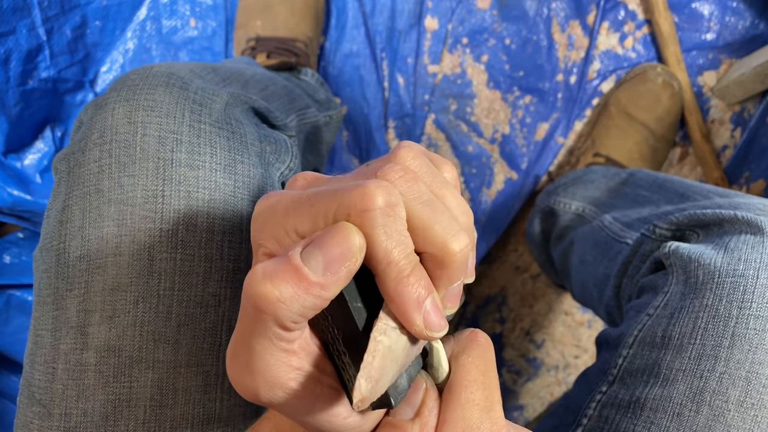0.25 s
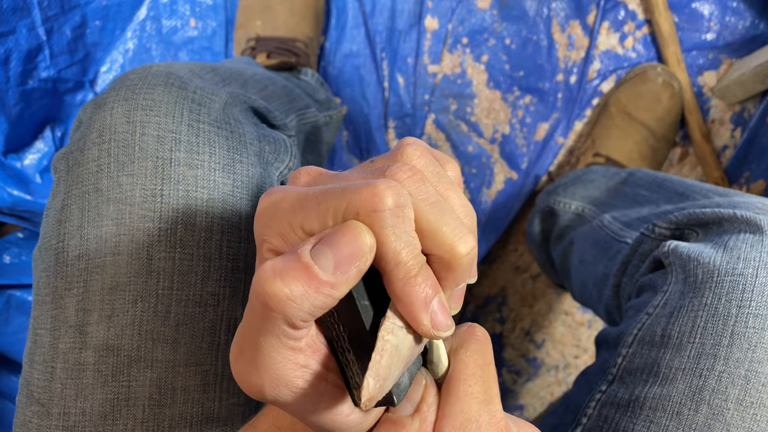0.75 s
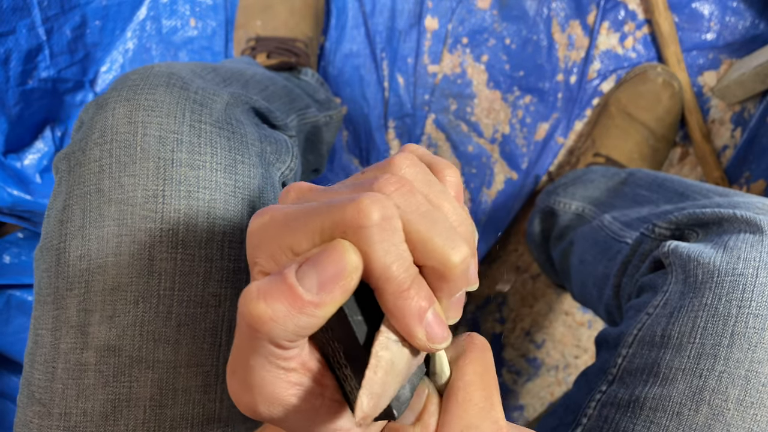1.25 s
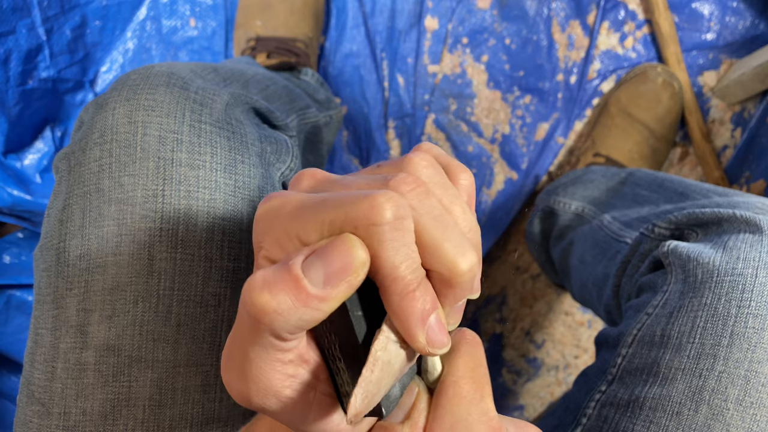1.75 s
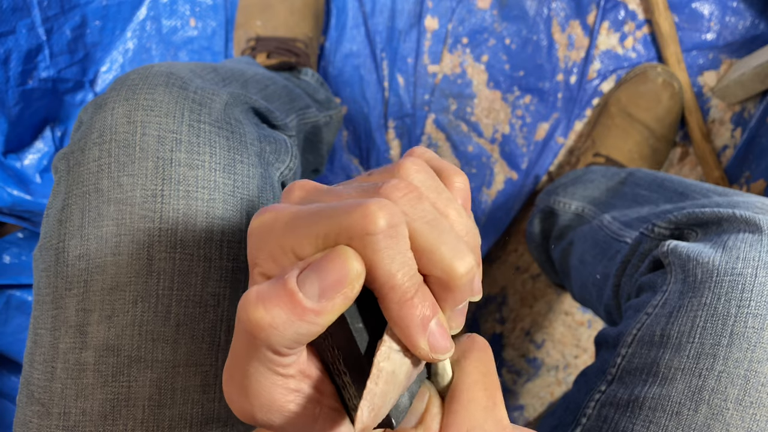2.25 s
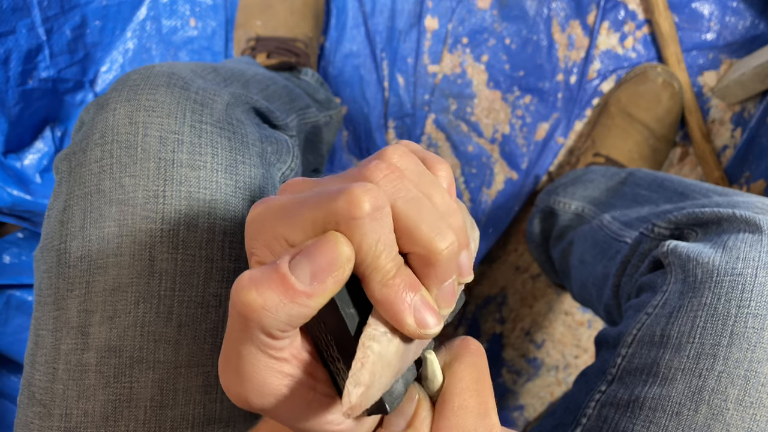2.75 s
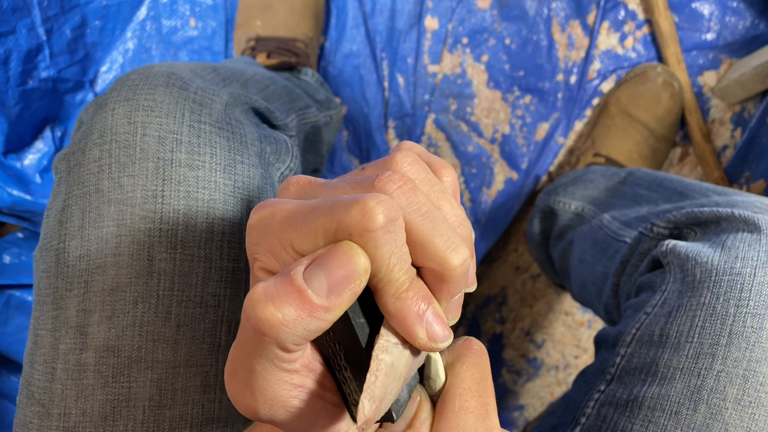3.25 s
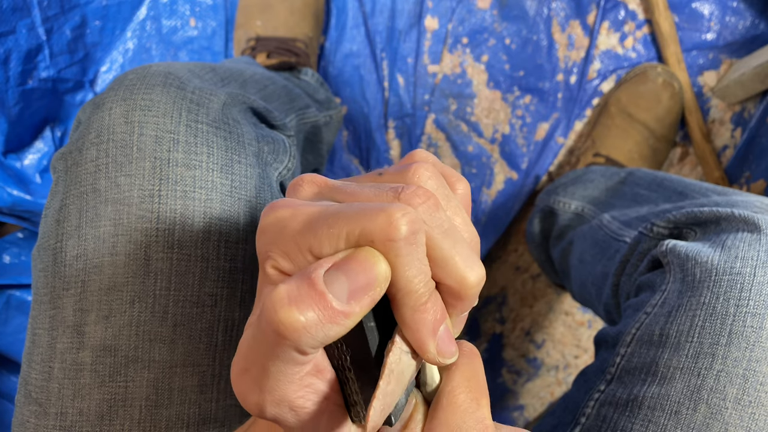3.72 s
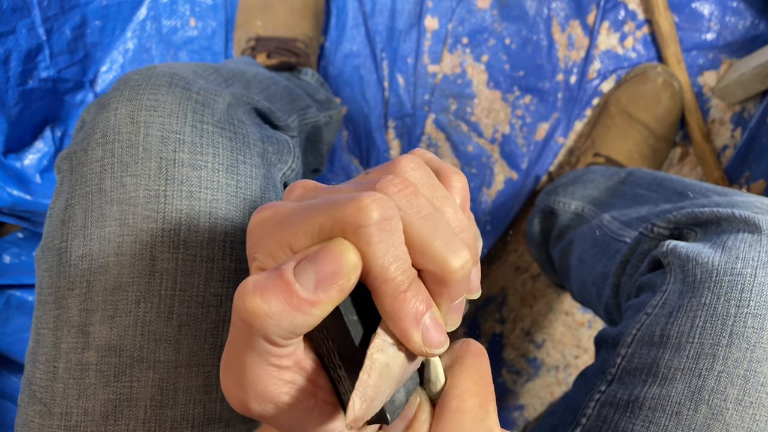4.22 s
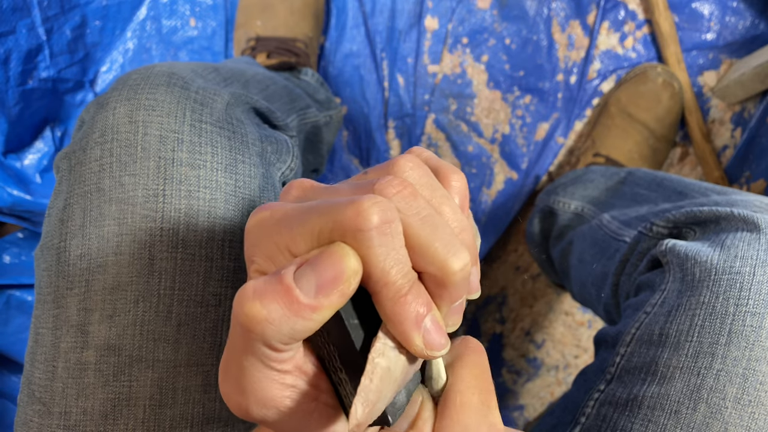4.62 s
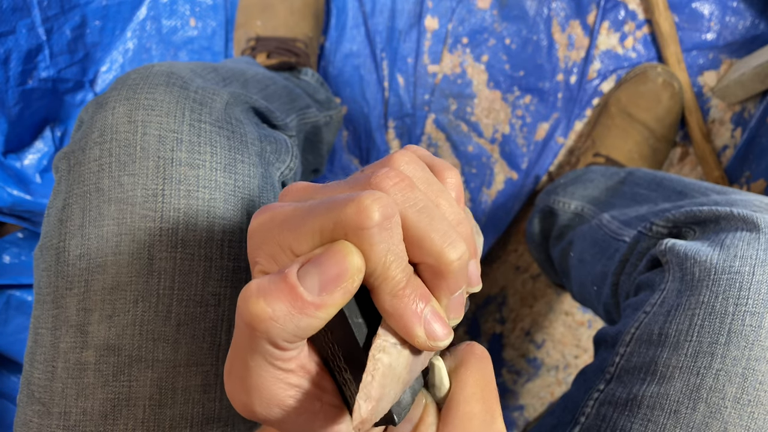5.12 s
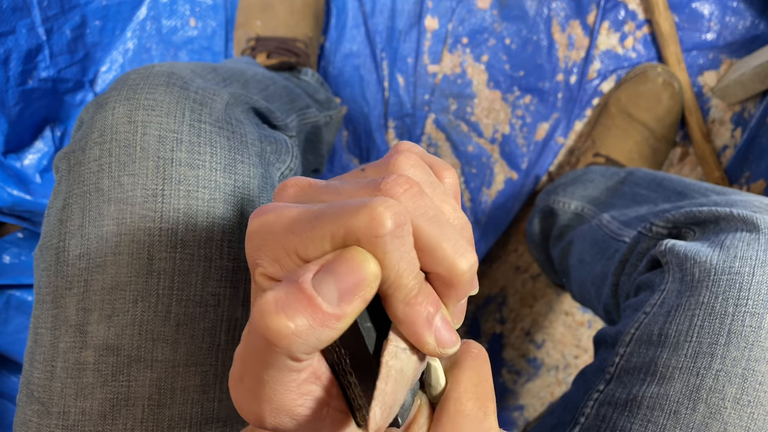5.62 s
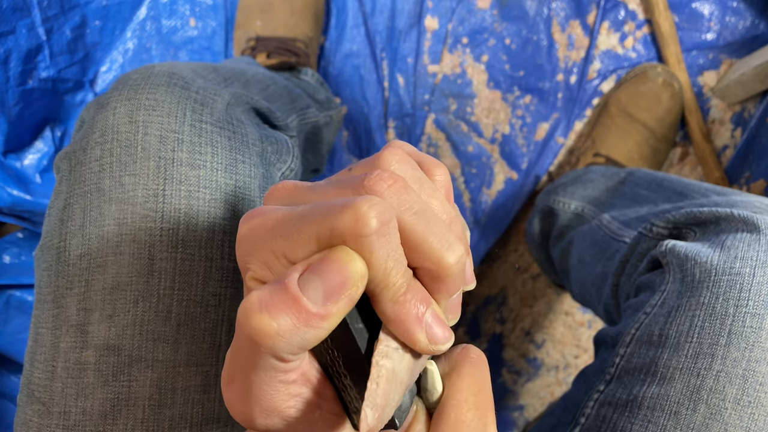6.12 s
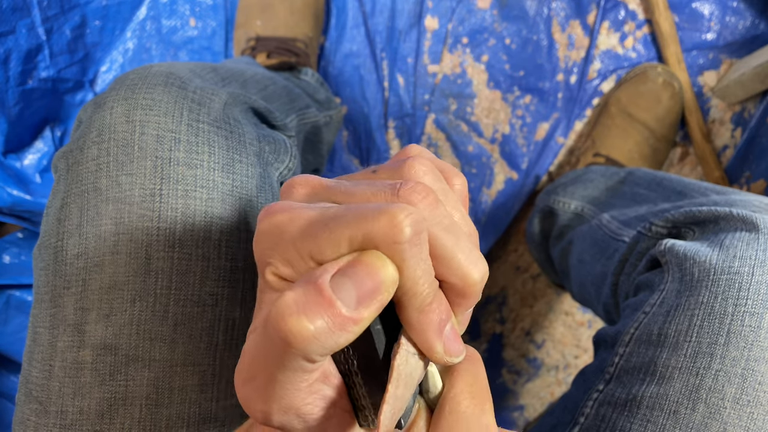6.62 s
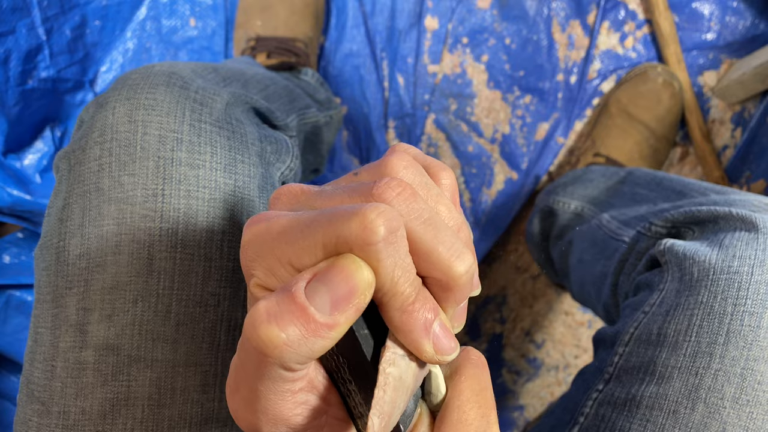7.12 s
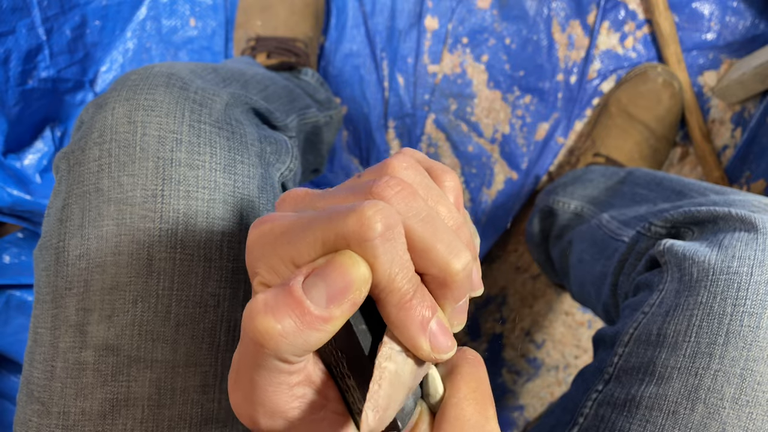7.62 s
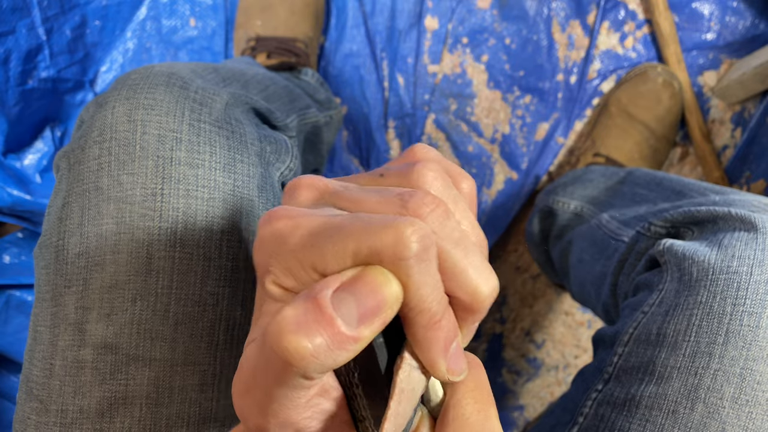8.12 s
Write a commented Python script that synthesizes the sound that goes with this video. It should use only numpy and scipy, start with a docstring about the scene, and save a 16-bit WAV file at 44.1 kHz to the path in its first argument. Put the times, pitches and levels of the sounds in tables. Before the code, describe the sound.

Very close, a pointed tool presses flakes off a hand-held stone. After a quiet second a sharp crack snaps, then a quick cluster of smaller clicks and gritty ticks, a pause, another hard crack near four seconds, and scattered snaps to the end. Each rings only briefly in a small dry room. A low ventilation hum swells and sinks beneath soft air noise.

```python
"""Pressure flaking of a hand-held flint, close by, in a small dry room.
From the start filtered noise gives a ventilation hum that swells and sinks, a rush of air and a far sine-wave motor.
Soon the tool tip grits on the edge in small noise bursts, and faint whistles of narrow noise fall in pitch.
From the first second flakes snap off: jerky noise bursts run for milliseconds; stone and room ring on briefly.
Soft rustles and scrapes of dense grit follow between the breaks; the motor is loudest in the middle."""
import sys
import numpy as np
from scipy import signal
from scipy.fft import rfft, irfft
from scipy.io import wavfile
from scipy.ndimage import uniform_filter1d

SR = 44100
rng = np.random.default_rng(int(sys.argv[2]) if len(sys.argv) > 2 else 0)


def generate_wav(signal):
    """Clip the signal to [-1, 1] and save it as 16-bit WAV at the path in sys.argv[1]."""
    frames = np.transpose(np.atleast_2d(signal))
    scaled = np.clip(frames, -1, 1) * 32767
    pcm = np.round(scaled).astype(np.int16)
    wavfile.write(sys.argv[1], SR, pcm)


N = 368676
TIME = np.arange(N) / SR

# Flakes snapping off: (time [s], crack level [dB], thud re crack [dB], knock re crack [dB],
# plate ring re crack [dB], top re crack [dB], flake pitch [Hz], crack duration [s])
FLAKE_SNAPS = [(1.0156, -16.5, -27.5, -12, -4.5, -4, 2600, 0.0035),
               (1.4851, -31.5, -21, -5.5, -13, 0, 4740, 0.0034),
               (1.5006, -31, -32, -9, -3.5, -9, 4680, 0.0032),
               (1.5198, -32, -19, -12, -7, -8.5, 5260, 0.0056),
               (1.5848, -39, -26, -2.5, -6.5, -11.5, 2280, .0011),
               (1.802, -31.5, -17, -12, -17.5, -5.5, 5900, 0.0024),
               (2.093, -30, -14.5, -7.5, -6.5, -2, 6200, 0.0051),
               (2.3077, -45, -9, -2, -3, -7, 5000, 0.0034),
               (3.9596, -16.5, -26.5, -20, -18.5, -5.5, 5160, 0.0066),
               (4.4002, -40.5, -23.5, -7.5, -6, 0.5, 5340, 0.004),
               (4.4256, -31, -28, -13.5, -10.5, -7.5, 5060, 0.0018),
               (4.4437, -39, -18, -10, -8, -4.5, 5150, .0036),
               (4.7116, -31, -23.5, -21, -25, -2.5, 5500, 0.0055),
               (5.7134, -20.5, -28.5, -12, -4, -3, 1690, 0.003),
               (6.586, -25.5, -26.5, -21.5, -8.5, -9.5, 4180, 0.0011),
               (6.6542, -22, -21.5, -19.5, -14, -6, 7000, 0.0023),
               (7.2024, -45, -18, -6, 2.5, 2.5, 3600, 0.003), (7.397, -23, -15.5, -13, -5, 0, 3600, 0.0033),
               (8.21, -32, -14, -13.5, -9, -6, 4470, .0024)]
# Grains crushed by the tool tip: (time [s], level [dB], body re level [dB], top re level [dB])
GRAIN_TICKS = [(.056, -70.5, -3, -1), (.19, -78, -15.5, -11), (0.648, -66, -5, 3), (1.433, -78, 6, 3),
               (1.687, -52, -8.5, -7), (1.71, -51, -14, -6), (1.7338, -43.5, -2.5, 0),
               (1.7496, -43.5, -10, -1), (1.7655, -45.5, -4.5, -1), (1.782, -55.5, 3, 5),
               (2.074, -51, -4.5, -13), (2.128, -46.5, -1.5, 1.5), (2.1991, -41.5, -17, -5.5),
               (2.2991, -44.5, -13, -4), (2.334, -42.5, -8.5, -13), (2.457, -56, -12, -3),
               (2.554, -56, 0, -5), (2.563, -56.5, -3, -20), (2.576, -52.5, -5.5, -3),
               (2.751, -61, -16, -14), (3.319, -69.5, -10, -4), (3.582, -70, 0.5, 5),
               (3.661, -66.5, -4, -3), (3.731, -65.5, -10, 9), (3.786, -51, -8.5, 6), (3.802, -58, -10, 15),
               (3.935, -50, -14, -13), (4.26, -73.5, -12.5, -5), (4.4167, -42.5, -4, -7),
               (4.496, -51.5, -7.5, -4), (4.665, -64, 4, -13), (4.697, -58, -5, -5), (4.931, -47, -17, -12),
               (4.944, -41.5, -18, -4.5), (5.522, -72.5, -12, -5), (5.689, -49, -10.5, -6),
               (5.865, -52.5, -13, -7), (6.167, -64, -9.5, -0.5), (6.231, -63.5, -7, -8),
               (6.357, -51, -14, 0), (6.497, -63.5, -7, -3), (6.769, -64.5, -11, -8), (7.134, -65, -10, 1),
               (7.19, -54, -8, -1), (7.2862, -40.5, -12, -2.5), (7.863, -66, -2, -6.5),
               (8.017, -56.5, -4, -13.5), (8.0729, -45.5, -4.5, -31), (8.16, -61, -4, -18)]
# Tip scraping along the edge: (time [s], length [s], level [dB])
TIP_SCRAPES = [(1.522, .2, -66), (1.724, .1, -61), (2.103, 0.04, -63), (2.284, 0.082, -51),
               (3.548, 0.34, -77), (3.776, 0.039, -40.5), (4.431, 0.21, -69.5), (4.781, .15, -76.5),
               (6.328, .18, -69), (7.081, 0.42, -66), (7.848, .12, -78), (8.007, 0.21, -67)]
# Resonances of the held stone: (frequency [Hz], width [Hz], boost [dB])
STONE_RESONANCES = [(1033.5, 400, 4), (2480, 260, 2.5), (3010, 410, 3.5), (5310, 1800, 2.5),
                    (6860, 600, 4.5)]
# Ring of stone and tool: (frequency [Hz], amplitude re unit impulse [dB], 60 dB decay time [s])
RINGING_MODES = [(2408, -51.5, .12), (2460, -52, 0.12), (2616, -53, 0.082), (3140, -55.5, .06),
                 (3265, -54, .09), (4980, -57.5, 0.17), (4840, -50, 0.07), (5540, -54.5, 0.066),
                 (5990, -55.5, .08), (6720, -56, .06)]
# Room decay: (frequency [Hz], 60 dB decay time [s])
ROOM_DECAY = [(200, 0.17), (530, .2), (1400, 0.16), (3700, 0.14), (6000, 0.14), (13000, 0.11)]
# Room strength: (frequency [Hz], level re direct sound [dB])
ROOM_STRENGTH = [(200, 0.5), (1000, -12), (2500, -5), (5000, -7.5), (7500, -11), (9000, -13), (12000, -8),
                 (16000, -18)]
# Stereo correlation of room and air: (frequency [Hz], left-right likeness [-1 to 1])
STEREO_LIKENESS = [(60, 0.91), (200, 1), (600, 0), (2000, 0.064), (8000, 0.00049)]
# Soft, dull rustles: (time [s], length [s], level [dB])
SOFT_RUSTLES = [(1.453, 0.27, -70), (2.053, 0.54, -69), (2.5, 0.81, -71), (8.0, .25, -73.5)]
# Slow swell of the hum: (time [s], level [dB])
HUM_SWELL = [(0, -50), (2.5, -46.5), (2.75, -45), (3.3, -44), (3.7, -53), (4.0, -48.5), (4.8, -51),
             (5.18, -44.5), (5.6, -51.5), (6.0, -48.5), (6.12, -44), (6.4, -45), (6.6, -52), (7.2, -45.5),
             (7.55, -51.5), (7.78, -44), (8.0, -56), (8.27, -50.5)]
# Hum resonances: (frequency [Hz], width of each of two passes [Hz], relative level before summing [dB])
HUM_RESONANCES = [(65.1, 5.3, -2.5), (73.04, 4.4, 0.5), (88.26, 14, -5), (111, 10, -20)]
# Far motor: (time [s], pitch [Hz], level [dB])
MOTOR_COURSE = [(2.9, 96, -78.5), (3.3, 106, -56), (3.9, 116, -65.5), (4.5, 120, -64), (5.2, 115, -61),
                (6.0, 114, -67), (6.6, 111, -73)]
# Moving air, in the 300-2000 Hz band before brightening: (time [s], level [dB])
AIR_COURSE = [(0, -64.5), (1.4, -64.5), (2.4, -63.5), (2.9, -65.5), (4.5, -66.5), (5.3, -67.5), (8.36, -67)]
# Colour of the air noise: (frequency [Hz], relative density [dB per Hz])
AIR_SPECTRUM = [(76, -32.5), (130, -10), (195, -1.5), (235, -7), (270, -4.5), (322, -8.5), (356, -11),
                (453, -5), (625, -13.5), (692, -8), (1780, -19.5), (2320, -26.5), (3260, -37.5),
                (5850, -41.5), (9290, -47.5), (11600, -48.5), (16000, -57)]
# Faint falling whistles: (time [s], length [s], start pitch [Hz], width [Hz], level [dB])
FALLING_WHISTLES = [(0.603, 0.32, 3630, 420, -79), (1.914, 0.24, 3570, 300, -79.5),
                    (2.355, 0.23, 3700, 420, -76.5), (3.242, 0.15, 3850, 1000, -79),
                    (3.424, 0.21, 3870, 1500, -78), (4.03, 0.2, 3770, 280, -79),
                    (4.884, 0.22, 3550, 280, -77), (5.38, .28, 3580, 380, -81.5),
                    (5.839, 0.2, 3670, 700, -79.5), (7, 0.25, 4030, 400, -81.5),
                    (7.52, .32, 3850, 340, -77.5)]

# Single grains giving way during a scrape, set above its grit but capped in mean level
STRAY_TICKS_PER_S, STRAY_OVER_GRIT_DB, STRAY_SCATTER_DB, STRAY_LOUDEST_DB = 13, 6, 0.5, -66.5
# A crack gathers speed; it reaches the left side a little late
CRACK_RISE_S, LEFT_LAG_S = .0004, .00007
WHISTLE_FALL_OCTAVES_PER_S = 1.3
CUTOFF_HZ = 16300
TINY = 1e-18  # keeps recursive filters off extremely small numbers


def from_db(db):
    """Logarithmic level: convert decibels to amplitude gain."""
    return 10 ** (np.asarray(db) / 20)


def rms_one(x):
    """Effective value: scale a signal to unit rms."""
    return x / np.sqrt(np.mean(x ** 2) + 1e-30)


def at_hz(points, hz):
    """Logarithmic pitch: interpolate a table along log frequency."""
    freqs, values = np.transpose(points)
    return np.interp(np.log(hz), np.log(freqs), values)


def band(x, low_hz, high_hz, order=2):
    """Causal band-pass filtering: keep one frequency range."""
    edges = [low_hz, min(high_hz, .48 * SR)]
    return signal.sosfilt(signal.butter(order, edges, "band", fs=SR, output="sos"), x)


def resonate(x, hz, width_hz):
    """Damped resonance: a pole pair, with about unit gain at its peak."""
    r = np.exp(-np.pi * width_hz / SR)
    numerator = np.array([1, 0, -1]) * (1 - r * r) / 2
    return signal.lfilter(numerator, [1, -2 * r * np.cos(2 * np.pi * hz / SR), r * r], x)


def pair(noise, alike):
    """Stereo correlation: mix two independent noises into left and right with a given likeness."""
    alike = np.clip(alike, -.99, .99)
    shared = np.sqrt(1 + alike) * noise[0]
    opposed = np.sqrt(1 - alike) * noise[1] * np.array([[1], [-1]])
    return (shared + opposed) / np.sqrt(2)


def pan(db):
    """Level difference between the sides: left and right gains, left louder when positive."""
    return from_db(np.array([[db], [-db]]) / 2)


def add(out, s, sound):
    """Superposition: add a sound into the mix at a time in seconds."""
    at = int(np.clip(round(s * SR), 0, N - 1))
    out[:, at:at + sound.shape[-1]] += sound[..., :N - at]


def fade_ends(n):
    """Gradual onset and release: a window with cosine-shaped ends."""
    return signal.windows.tukey(n, .6)


def snaps(body_pan_db=-3.5, crack_pan_db=-1.5):
    """Brittle fracture: flakes crack and knock through stone into hand; all but the top leans right."""
    out = np.zeros((2, N))
    for s, db, thud_db, knock_db, plate_db, top_db, flake_hz, duration in FLAKE_SNAPS:
        body_zones = [(151, 620, db + thud_db, .85), (786, 2100, db + knock_db, 0.5),
                      (2310, 3900, db + plate_db, 0.74)]
        body = pan(body_pan_db) * fracture(duration, body_zones, flake_hz)
        crack = pan(crack_pan_db) * fracture(duration, [(3920, 7610, db, 0.26)], flake_hz)
        top = fracture(duration, [(10370, 14000, db + top_db, .25)], flake_hz)
        add(out, s, body + crack + top)
    return out


def fracture(duration, zones, flake_hz, flake_width_hz=420, flake_db=7.5,
             jerk_db=5.0, after_db=-17, after_s=0.015):
    """Crack propagation: it runs in uneven jerks, excites resonances and dies in the gripping hand.

    Zones are (low edge [Hz], high edge [Hz], level [dB], left-right likeness)."""
    t = np.arange(1500) / SR
    main_push = np.exp(-(t / max(duration, .0003)) ** 3)
    faint_tail = from_db(after_db) * np.exp(-t / after_s)
    rise = 1 - np.exp(-(t / CRACK_RISE_S) ** 2)
    jerks = (main_push + faint_tail) * rise * from_db(jerk_db * rng.standard_normal(len(t)))
    # the loose flake adds a brief pitch of its own to the resonances of the stone
    peaks = list(STONE_RESONANCES) + [(flake_hz, flake_width_hz, flake_db)]
    out = 0
    for low_hz, high_hz, db, alike in zones:
        burst = pair(rng.standard_normal((2, len(t))), alike) * jerks
        for hz, width_hz, boost_db in peaks:
            burst = burst + (from_db(boost_db) - 1) * resonate(burst, hz, width_hz)
        burst = band(burst, low_hz, high_hz, order=3)
        # the level counts the energy of the whole burst as if spread over six milliseconds
        burst_rms = np.sqrt(np.sum(burst ** 2, axis=1, keepdims=True) / (.006 * SR))
        out = out + from_db(db) * burst / burst_rms
    late_left = np.interp(t - LEFT_LAG_S, t, out[0])
    return np.array([late_left, out[1]])


def ticks():
    """Grain crushing: single clear ticks, and a random patter of faint ones during each scrape."""
    out = np.zeros((2, N))
    for s, db, body_db, top_db in GRAIN_TICKS:
        add(out, s, tick(db, body_db, top_db))
    for s, length, grit_db in TIP_SCRAPES:
        count = max(1, round(length * STRAY_TICKS_PER_S))
        mean_db = min(grit_db + STRAY_OVER_GRIT_DB, STRAY_LOUDEST_DB)
        for k in range(count):
            when = s + length * (k + rng.random()) / count
            add(out, when, tick(mean_db + STRAY_SCATTER_DB * rng.standard_normal()))
    return out


def tick(db, body_db=-10, top_db=-3, duration=0.0029, knock_db=-5, pan_db=-1.0):
    """Contact failure: one grain gives way under the tip, with its own share of body and top."""
    zones = [(650, 1700, db + body_db + knock_db, 0.51), (1880, 3600, db + body_db, 0.17),
             (4243, 8230, db, 0.16), (10280, 15500, db + top_db, 0.36)]
    return pan(pan_db) * fracture(duration, zones, flake_hz=rng.uniform(4200, 6500))


def crumbs(count=3, spread_s=0.042, below_db=-14, scatter_db=3, loudest_db=-46):
    """Secondary breakage: the slipping tip drags a few finer crumbs after each tick and snap."""
    clicks = np.zeros((2, N))
    for s, db, *_ in list(GRAIN_TICKS) + list(FLAKE_SNAPS):
        delays = rng.exponential(spread_s, count)
        sizes, sides = rng.standard_normal((2, count))
        for delay, size, side in zip(delays, sizes, sides):
            grain = rng.standard_normal((2, 40)) * np.hanning(40) * 4
            gain = from_db(min(db, loudest_db) + below_db + scatter_db * size)
            add(clicks, s + delay, grain * pan(2 * side) * gain)
    return band(clicks + TINY, 3500, 15000)


def scrapes(grains_per_s=1500, scatter_db=5.0, top_db=-4):
    """Sliding friction: dense fine grit is ground between tip and stone as the tip looks for a hold."""
    grit = np.zeros((2, N))
    for s, length, db in TIP_SCRAPES:
        n = int(length * SR)
        hits = rng.random(n) < grains_per_s / SR
        sizes = hits * from_db(scatter_db * np.minimum(rng.exponential(1, n), 3))
        grains = sizes * rng.standard_normal((2, n)) * fade_ends(n)
        add(grit, s, from_db(db) * rms_one(grains))  # level before the two bands are cut out
    grit = grit + TINY
    return band(grit, 2700, 6800) + from_db(top_db) * band(grit, 10230, 15000)


def stone_ring(x):
    """Modal vibration: every break leaves the held stone and the tool ringing briefly."""
    out = 0
    for hz, db, t60 in RINGING_MODES:
        r, w = from_db(-60 / (t60 * SR)), 2 * np.pi * hz / SR
        # impulse response: a sine that decays by 60 dB in t60
        mode = signal.lfilter([0, np.sin(w)], [1, -2 * r * np.cos(w), r * r], x + TINY)
        out = out + from_db(db) * mode
    return out


def room(x, first_s=0.00033, build_s=.003, lumpy_db=0.5):
    """Reverberation: near surfaces return a dense, uneven tail that dies fastest in the treble."""
    t = np.arange(int(.4 * SR)) / SR
    edges = np.geomspace(110, 17000, 19)
    build_up = 1 - np.exp(-np.maximum(t - first_s, 0) / build_s)
    onset = build_up * from_db(lumpy_db * rng.standard_normal(len(t)))
    response = 0
    for low, high in zip(edges, edges[1:]):
        hz = np.sqrt(low * high)
        decay = onset * from_db(-60 * t / at_hz(ROOM_DECAY, hz))
        noise = pair(rng.standard_normal((2, len(t))), at_hz(STEREO_LIKENESS, hz))
        tail = noise * decay / np.linalg.norm(decay)
        response = response + from_db(at_hz(ROOM_STRENGTH, hz)) * band(tail, low, high)
    return signal.fftconvolve(x, response, axes=1)[:, :N]


def rustles(low_hz=500, high_hz=1050):
    """Soft friction: band-limited noise, as of a hand shifting on cloth."""
    out = np.zeros((2, N))
    for s, length, db in SOFT_RUSTLES:
        n = int(length * SR)
        rub = band(pair(rng.standard_normal((2, n)), 0.18), low_hz, high_hz) * fade_ends(n)
        add(out, s, from_db(db) * rms_one(rub))
    return out


def hum(evenness=0.38, rumble_db=-17):
    """Room modes: ventilation noise gathers in low resonances that beat together and waver."""
    white = rng.standard_normal(N + SR)  # the extra first second lets the resonances settle
    drone = 0
    for hz, width_hz, db in HUM_RESONANCES:
        mode = resonate(resonate(white, hz, width_hz), hz, width_hz)[SR:]
        drone = drone + from_db(db) * rms_one(mode)
    # the beating between the modes is partly evened out
    beating = np.sqrt(uniform_filter1d(drone ** 2, size=4000))
    swell = from_db(np.interp(TIME, *np.transpose(HUM_SWELL)))
    drone = rms_one(drone / beating ** evenness) * swell
    rumble = rms_one(band(pair(rng.standard_normal((2, N)), 0.23), 25, 69))
    rumble = rumble * np.std(drone) * from_db(rumble_db)
    return (drone + rumble) * pan(-3.0)


def motor():
    """Periodic rotation: one faint sine note from far outside speeds up and eases off."""
    s, hz, db = np.transpose(MOTOR_COURSE)
    note = np.sin(2 * np.pi * np.cumsum(np.interp(TIME, s, hz)) / SR)
    return rms_one(note) * from_db(np.interp(TIME, s, db))


def air(usual_db=-66, brighten_per_db=0.13):
    """Broadband flow noise: a dull, smooth rush of air, brighter when it is stronger."""
    hz = np.maximum(np.fft.rfftfreq(N, 1 / SR), 1)
    spectrum = pair(rfft(rng.standard_normal((2, N))), at_hz(STEREO_LIKENESS, hz))
    rush = irfft(spectrum * from_db(at_hz(AIR_SPECTRUM, hz)), N)
    rush = rush / np.std(band(rush, 300, 2000).mean(axis=0))
    db = np.interp(TIME, *np.transpose(AIR_COURSE))
    rush = rush + brighten_per_db * (db - usual_db) * band(rush, 980, 4500, order=1)
    return rush * from_db(db) * pan(0.66)


def whistles():
    """Narrow-band modulation: far, blurred whistles all slide downwards at the same rate."""
    out = np.zeros((2, N))
    for s, length, start_hz, width_hz, db in FALLING_WHISTLES:
        n = int(length * SR)
        pitch_hz = start_hz * 2 ** (-WHISTLE_FALL_OCTAVES_PER_S * TIME[:n])
        phase = 2 * np.pi * np.cumsum(pitch_hz) / SR
        low_pass = signal.butter(2, width_hz / 2, fs=SR, output="sos")
        blur = signal.sosfilt(low_pass, rng.standard_normal((2, 2, n)))
        tone = (blur[0] * np.cos(phase) + blur[1] * np.sin(phase)) * fade_ends(n)
        add(out, s, from_db(db) * rms_one(tone))
    return out


def scene(work_pan_db=-0.86):
    """Superposition: stone work, slightly to the right, in the room and over the background."""
    breaks = (snaps() + ticks() + crumbs() + scrapes()) * pan(work_pan_db)
    work = breaks + stone_ring(breaks)
    return work + room(work) + rustles() + hum() + motor() + air() + whistles()


def record(dry, notch_hz=9050, notch_width_hz=1400, depth=0.85):
    """Linear filtering: a narrow dip near 9 kHz in what left and right share; the top is cut."""
    coloured = dry - depth * resonate(dry.mean(axis=0), notch_hz, notch_width_hz)
    low_pass = signal.ellip(10, .2, 80, CUTOFF_HZ, fs=SR, output="sos")
    return signal.sosfilt(low_pass, coloured)


dry = scene()
out = record(dry)
generate_wav(out)
```